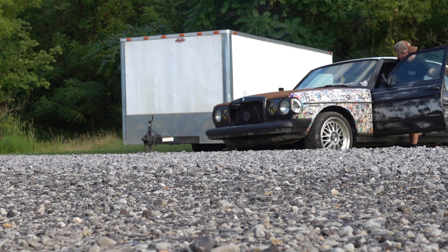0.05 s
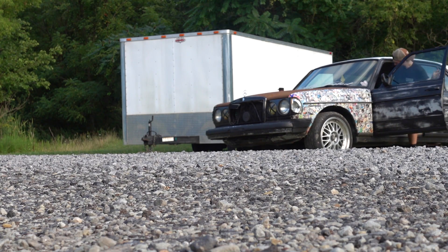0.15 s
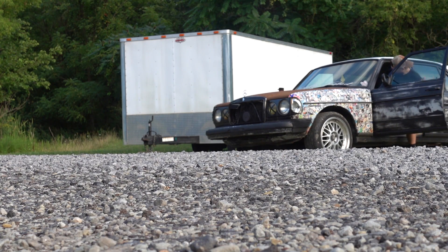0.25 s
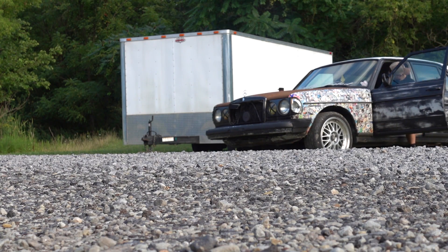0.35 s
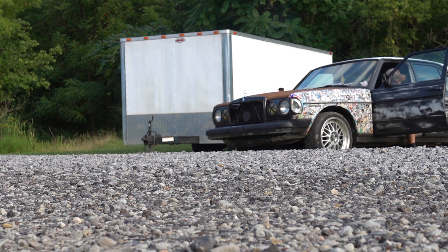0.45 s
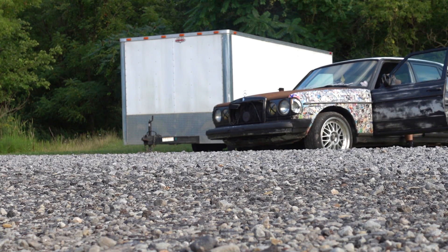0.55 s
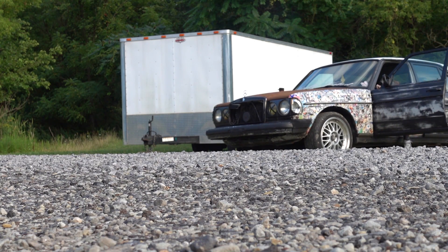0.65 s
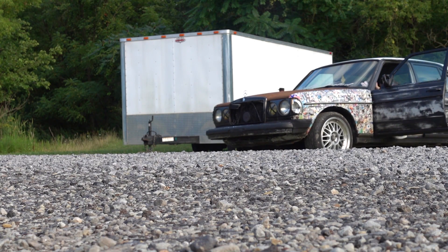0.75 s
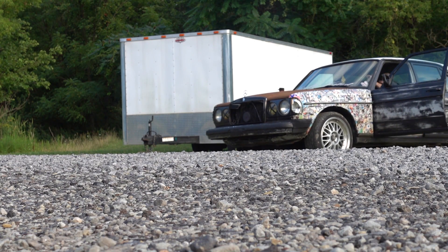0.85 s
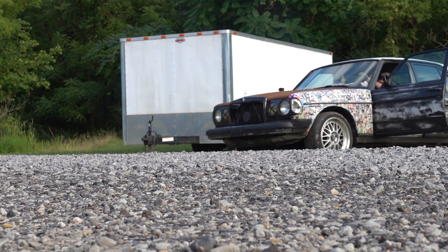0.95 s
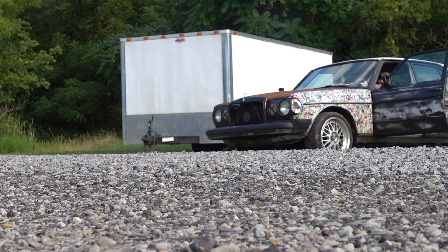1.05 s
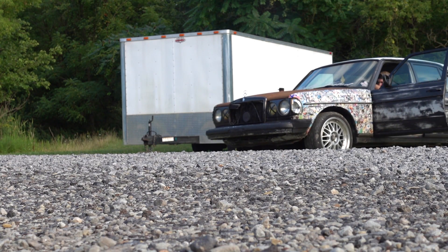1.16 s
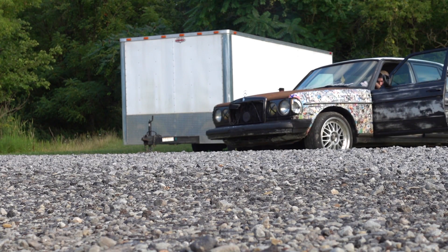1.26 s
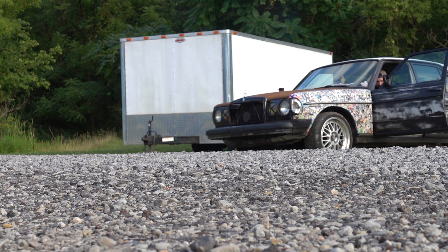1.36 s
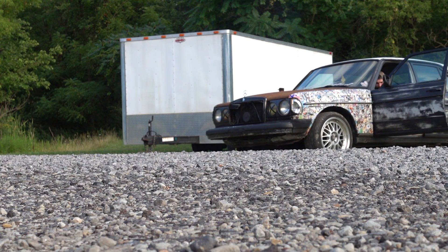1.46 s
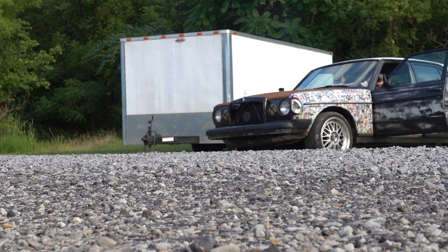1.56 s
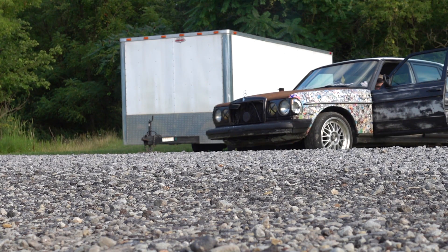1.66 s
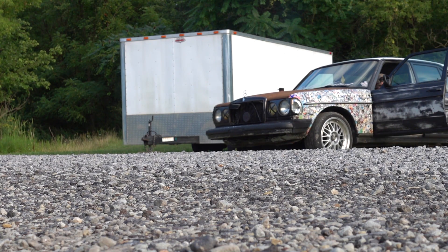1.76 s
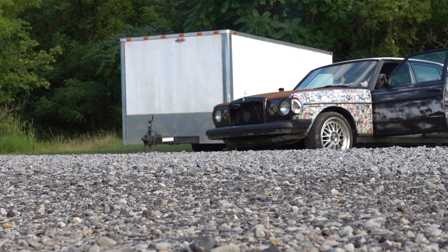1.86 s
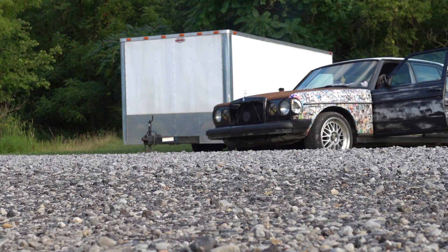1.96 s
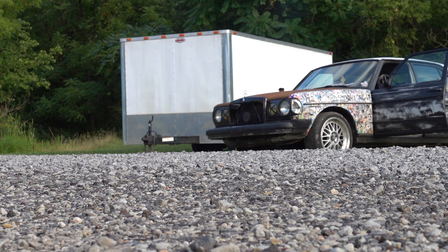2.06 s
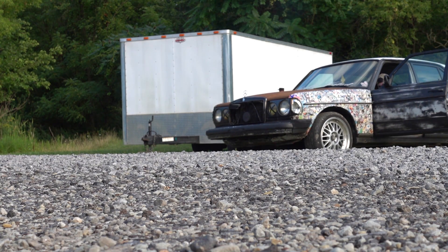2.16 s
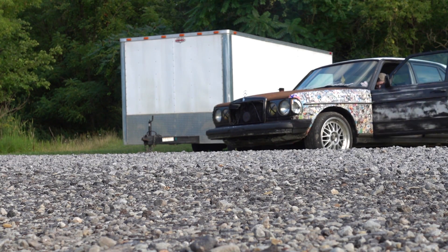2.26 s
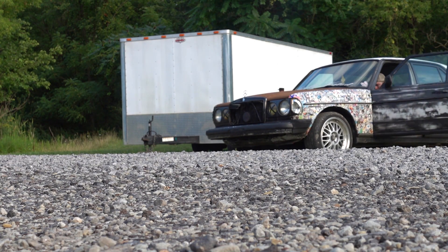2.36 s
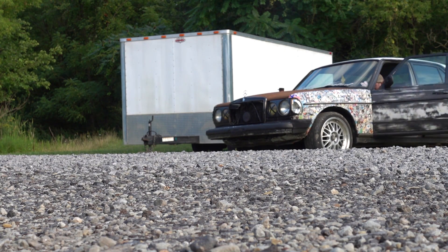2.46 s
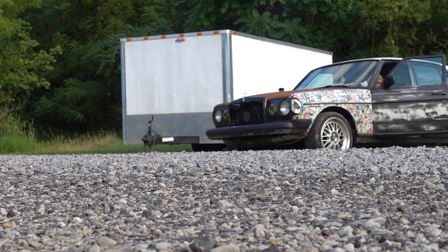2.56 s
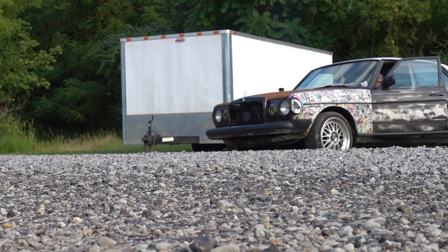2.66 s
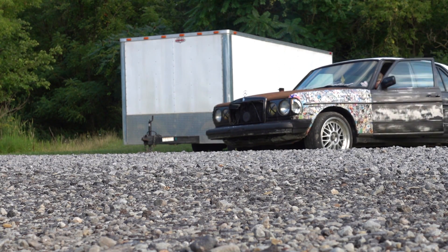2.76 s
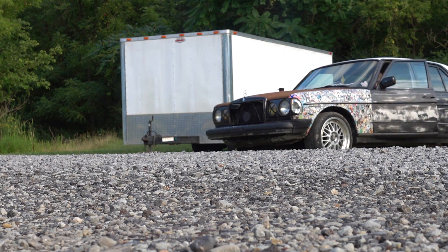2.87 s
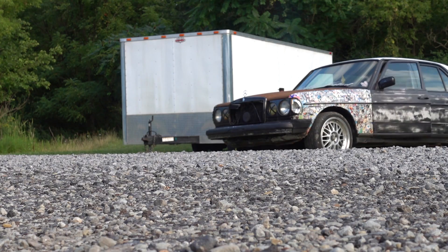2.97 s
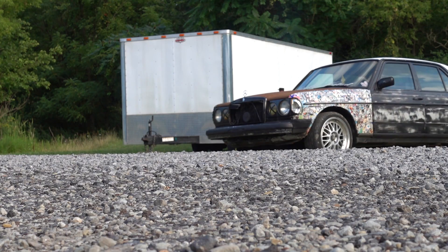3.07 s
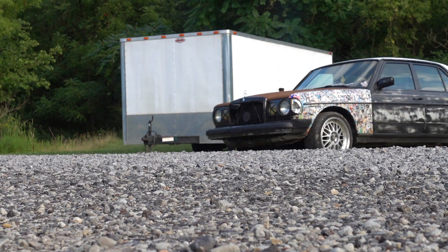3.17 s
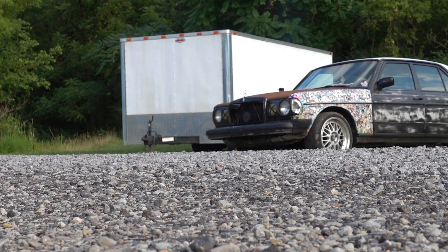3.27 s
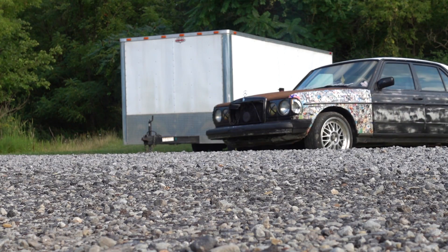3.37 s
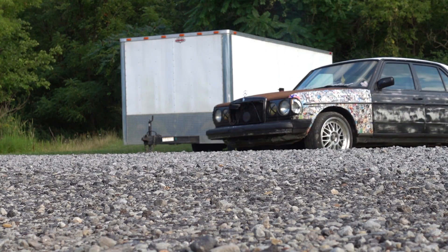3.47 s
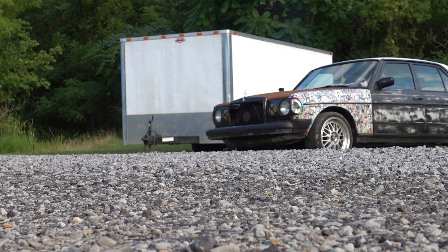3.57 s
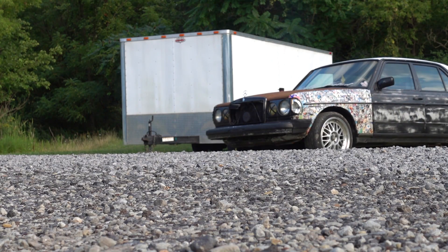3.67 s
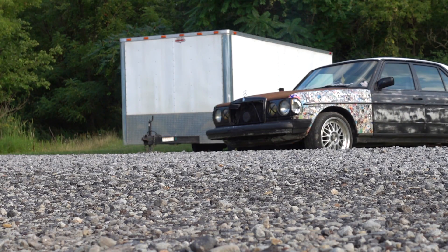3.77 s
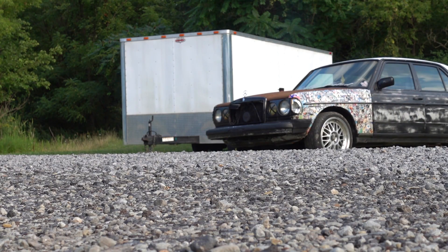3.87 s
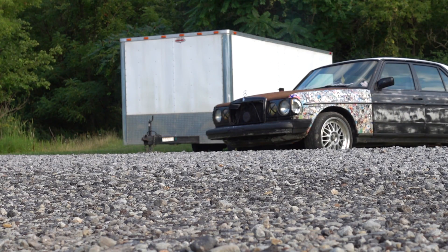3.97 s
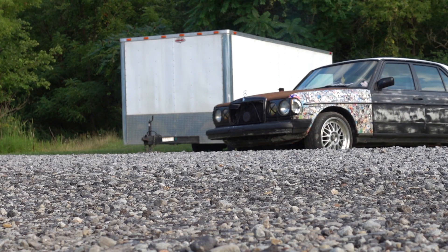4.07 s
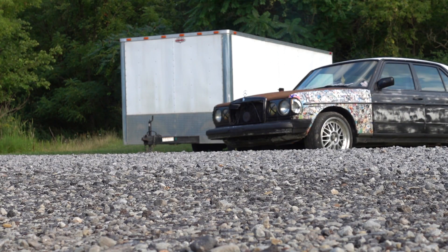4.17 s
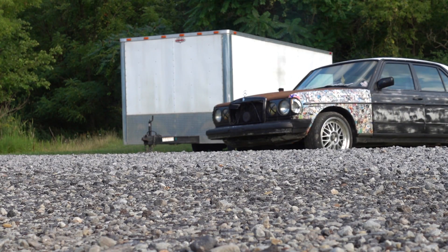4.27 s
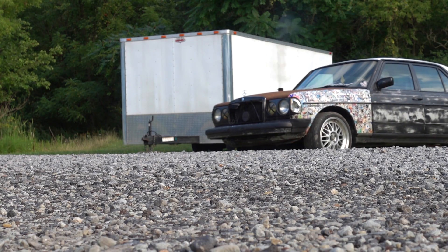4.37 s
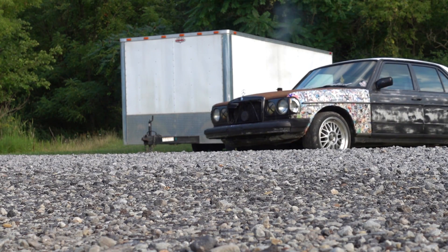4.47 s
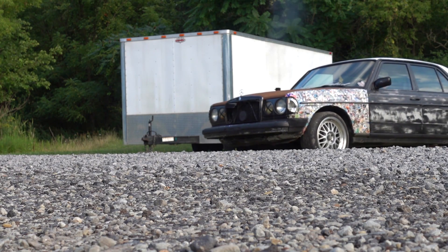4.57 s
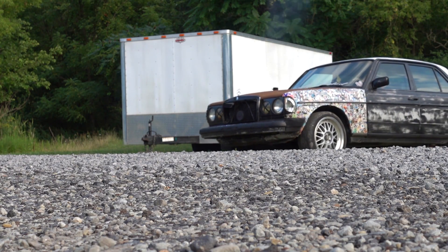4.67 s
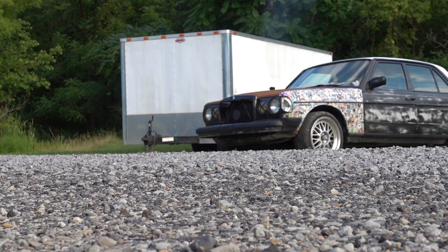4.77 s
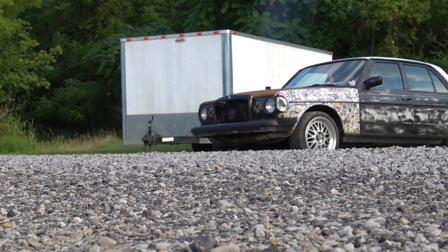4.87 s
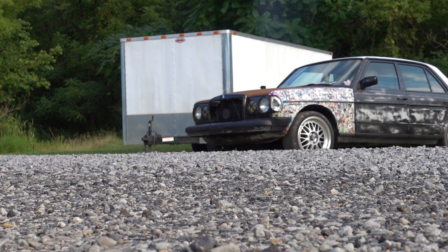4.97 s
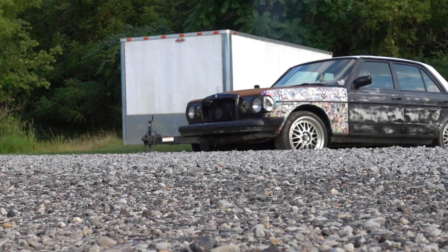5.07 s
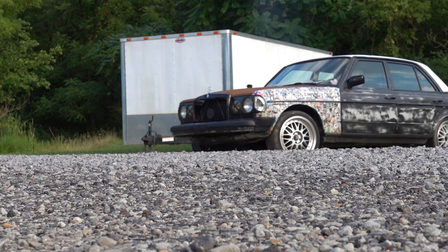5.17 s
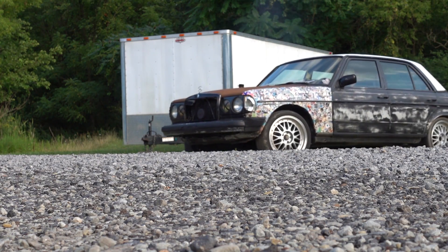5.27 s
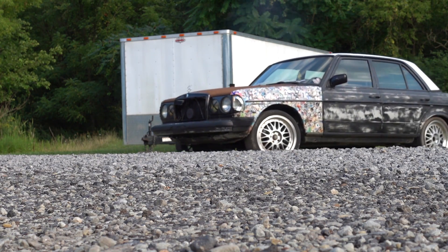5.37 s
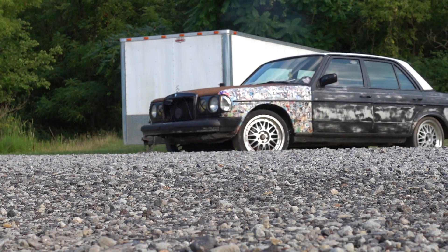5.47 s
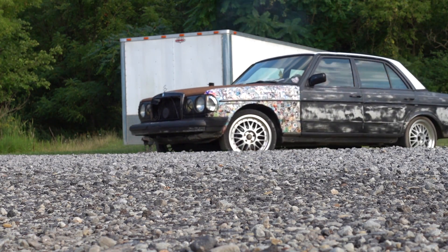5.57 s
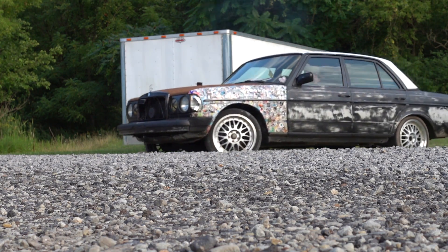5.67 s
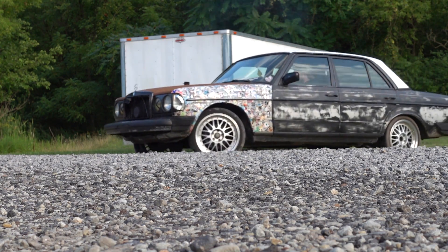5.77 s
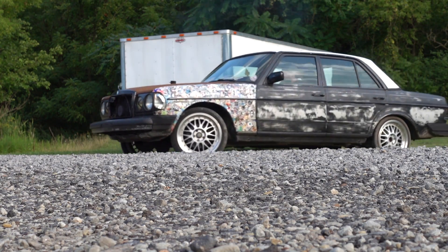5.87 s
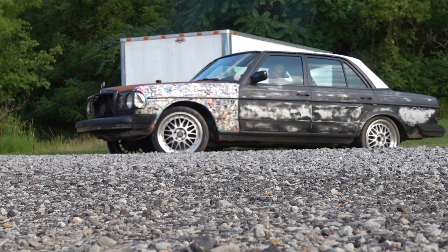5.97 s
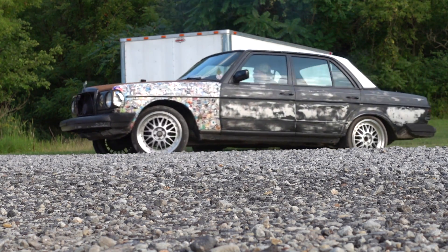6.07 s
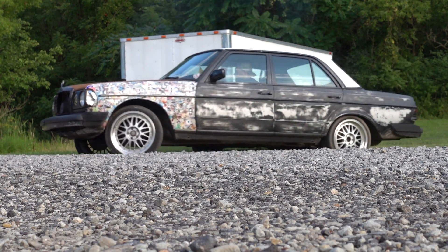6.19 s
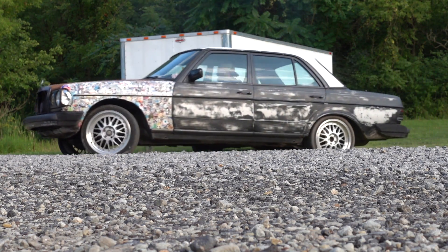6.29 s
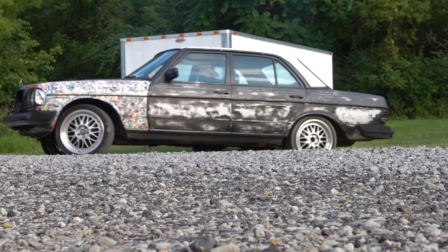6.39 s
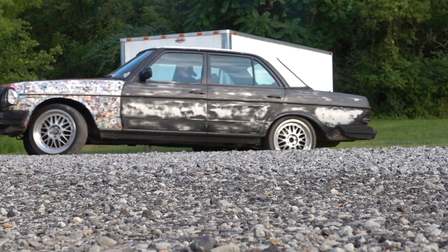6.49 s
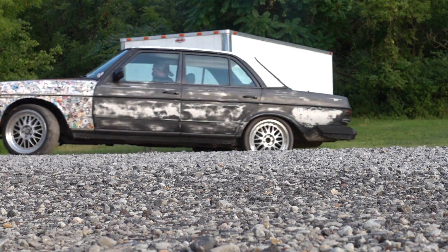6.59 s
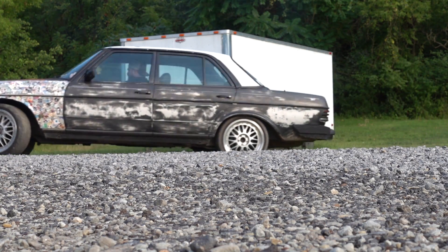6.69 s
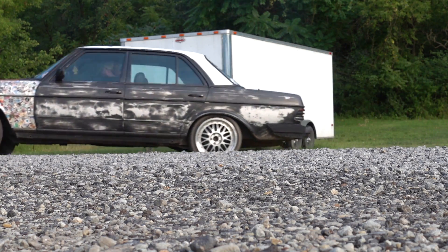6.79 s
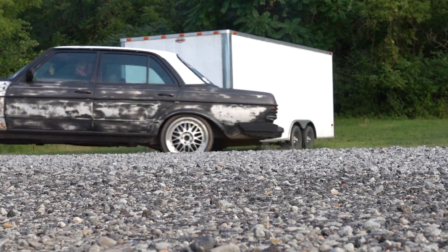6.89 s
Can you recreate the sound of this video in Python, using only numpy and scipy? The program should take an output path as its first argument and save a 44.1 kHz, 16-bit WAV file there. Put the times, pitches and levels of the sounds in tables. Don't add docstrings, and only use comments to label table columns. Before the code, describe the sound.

Rattly diesel idle with faint insects, one solid door slam, then a raspy, hissing rev and a loud roar as the car passes leftward.

```python
import sys
import numpy as np
from scipy import signal
from scipy.fft import rfft, irfft, next_fast_len
from scipy.io import wavfile
from scipy.ndimage import map_coordinates

SR = 44100
rng = np.random.default_rng(int(sys.argv[2]) if len(sys.argv) > 2 else 0)


def to_wav(sig):
    pcm = np.clip(np.atleast_2d(sig), -1, 1) * 32767
    pcm = np.round(pcm).astype(np.int16)
    wavfile.write(sys.argv[1], SR, pcm.T)


def volts_from_decibels(level):
    exponent = np.asarray(level, float) / 20
    return 10 ** exponent


N = 305613
T = np.arange(N) / SR

# [t/s, firing rate/Hz]
FIRING_RATE = [(0, 30.5), (4.27, 30.54), (4.38, 43.62), (4.45, 49.72), (4.55, 54.49), (4.7, 58.45),
               (4.9, 60.75), (5.1, 60.54), (5.25, 62.15), (5.4, 65.3), (5.7, 75), (5.85, 77.8), (6.1, 81.7),
               (6.2, 81.1), (6.4, 75.1), (6.6, 71), (6.8, 69), (6.93, 69.77)]
# [order, level/dB]
IDLE_ORDERS = [(5, -51), (14, -50), (15, -40), (16, -45), (18, -47), (19, -43), (20, -37), (21, -45),
               (23, -48), (26, -49), (28, -36), (29, -40), (30, -48), (31, -46), (33, -43), (35, -48)]
# [knock level/dB, valve tick level/dB]
CYLINDERS = [
    (-3, -10),
    (0, -10),
    (-13, -14),
    (-6, -12),
    (-2, 0),
]
# [f/Hz, width/Hz, level/dB]
BLOCK_RINGS = [
    (1410, 25, -10),
    (1700, 45, 0),
    (1860, 80, -15),
]
# [f/Hz, width/Hz, level/dB]
PIPE_RINGS = [(418, 90, -7.5), (587, 94, 0.5), (889, 64, -6), (971, 49, -1.5), (1320, 76, -7.5),
              (1623, 130, -13), (2072, 63, -9.5), (2490, 160, -12.5), (2920, 150, -12.5), (3400, 107, -14)]
# [f/Hz, level per Hz/dB]
CHUG_COLOUR = [(15, -47), (25, -13), (43, -18), (101, -7.5), (179, -3.5), (267, -10.5), (497, -9),
               (974, -12.5), (1720, -13), (2020, -23), (2430, -27.5), (6420, -36), (7750, -35),
               (9360, -39.5), (15600, -51)]
# [f/Hz, level per Hz/dB]
TICK_COLOUR = [(600, -19), (1500, 11.5), (3000, -9.5), (4700, 5.5), (6500, -3), (11000, -9), (15500, -20)]
# [f/Hz, level per Hz/dB]
LEAK_COLOUR = [(2060, -8.5), (3500, -5), (3660, -6.5), (4360, -4), (5630, -0.5), (6670, -2.5), (8780, -7.5),
               (12400, -11), (15600, -19)]
# [f/Hz, level per Hz/dB]
PULLING_COLOUR = [(18, -55), (30, -37), (156, -1.5), (187, -2.5), (400, -10.5), (608, -9), (750, -12),
                  (1600, -12.5), (2700, -26), (2920, -21), (3610, -20.5), (8110, -21), (15600, -27)]
# [f/Hz, width/Hz, level/dB]
INSECT_BAND = [(7680, 940, 0)]
# [t/s, thump level/dB, click level/dB, click f/Hz]
DOOR_CONTACTS = [(2.511, -44, -47, 11100), (2.52, -48, -53, 12000), (2.599, -36, -60, 3000),
                 (3.168, -19.5, -35, 6000), (3.18, -16, -32, 4540), (3.186, -10, -28.5, 2900),
                 (3.198, -18, -23, 2320), (3.207, -9.5, -34, 5000), (3.229, -19, -44, 3000),
                 (3.247, -27, -41, 6000), (3.329, -42, -43, 10500), (2.508, -58, -23, 900)]
# [f/Hz, level/dB, time to fall 60 dB/s]
PANEL_RINGS = [(40, -13, 0.18), (81.5, -3, 0.17), (102.3, -12.5, 0.14), (176, 0, 0.094), (257, -1, 0.075),
               (286, -3.5, 0.082), (356, -9.5, 0.069), (450, -3, 0.061), (508, -4, 0.048),
               (704, -10, 0.046), (920, -8, 0.038), (1410, -6.5, 0.034)]
# [f/Hz, likeness]
ALIKE = [(60, .99), (130, 0.71), (290, 0.81), (640, 0.97), (1400, 0.85), (3100, 0.75), (5500, 0.37),
         (8000, 0.94), (15000, 0.57)]
# [f/Hz, likeness]
ALIKE_CALM = [(60, .99), (130, 1), (290, 0.99), (640, 0.97), (1400, 0.85), (3100, 0.75), (5500, 0.067),
              (8000, 0.067), (15000, 0.68)]
# [f/Hz, time to fall 60 dB/s]
YARD_DECAY = [(100, 0.12), (1000, 0.88), (8000, 0.23)]
# [f/Hz, phase/rad]
LEFT_LEAD = [(20, 0), (400, .08), (2200, .25), (2600, .8), (3400, 1), (4700, 1.6), (6000, 0), (6500, -1.1),
             (7800, -1), (8600, -.6), (10200, .15), (15300, .1)]
# [f/Hz, width/Hz, level/dB]
VALVE_RINGS = [(1210, 41, 0), (1437, 82, 2), (1710, 196, -4)]
# [t/s, level/dB]
THROTTLE = [
    (4.27, -11),
    (4.32, -3.5),
    (4.45, -0.5),
    (4.9, -0.5),
    (5.25, -1),
    (5.6, 1),
    (6.2, 1),
    (6.7, -2.5),
    (6.93, 1.5),
]
TAKE_UP = [4.225, 4.3]
# [middle t/s, half length/s, level/dB]
BOOMS = [
    (4.45, .14, 14),
    (5.925, 0.4, 21),
    (6.8, 0.17, 8),
]
# [f/Hz, level/dB]
SILENCER = [(40, -62), (70, -63), (95, -36.5), (130, -37.5), (175, -38.5), (235, -37), (290, -43.5),
            (450, -47.5)]
FIRING_ORDER_DB = {15: 5, 20: 9}

ROLL_S, ROLL_BEND = 5.05, 1.25
SHADE_DB, PAN_DB = -17, 3.5
CRUISE = 60
FIRING_DB, OCTAVE_DB, UNEVEN_DB = -45.5, -19, -0.5
OCTAVE_DB_PER_HZ, BOOM_TAKES_DB, TAILPIPE_DB = 0.44, 9, 4.5
HEAT_PER_HZ, COOLS = .004, .07
SHRILL_S, SHRILL_DB, SWELL_DB_PER_S, FADE_DB_PER_S = 3.3, -63, 15, 4
SCATTER_DB = 1.2
BOUNCE, BOUNCE_S, BOUNCE_SHRINKS_S = .55, .000245, .00005


def unit(x):
    return x / np.sqrt(np.mean(x ** 2) + 1e-20)


def along(points, hz):
    f, v = np.transpose(points)
    return np.interp(np.log(hz + 1), np.log(f + 1), v)


def curves(rows):
    s, *cols = np.transpose(rows)
    return [np.interp(T, s, c) for c in cols]


def wobble(rate):
    knots = rng.standard_normal(int(N * rate / SR) + 4)
    return map_coordinates(knots, [np.arange(N) * rate / SR])


def filtered(x, response):
    m = next_fast_len(x.shape[-1] + SR // 2)
    return irfft(rfft(x, m) * response(np.fft.rfftfreq(m, 1 / SR)), m)[..., :x.shape[-1]]


def modes(table):
    def response(f):
        return sum((-1) ** k * volts_from_decibels(db) * 1j * f * w / (c * c - f * f + 1j * f * w)
                   for k, (c, w, db) in enumerate(table))
    return response


def coloured(spectrum):
    return lambda hz: volts_from_decibels(along(spectrum, hz))


def noise(response, alike=ALIKE, size=N):
    def mid_side(hz):
        turn = np.arccos(np.clip(along(alike, hz), -1, 1)) / 2
        return response(hz) * [np.cos(turn), np.sin(turn)]
    mid, side = filtered(rng.standard_normal((2, size)), mid_side)
    return unit(np.array([mid + side, mid - side]))


def beats(firings, sizes_db, scatter_db, rise, rest, order=1):
    k = np.floor(firings).astype(int)
    size = volts_from_decibels(np.asarray(sizes_db)[k % len(sizes_db)] + scatter_db * rng.standard_normal(600)[k % 600])
    u = (firings - k) / rise
    return unit(size * (u * np.exp(1 - u)) ** order + rest)


def strikes(firings, sizes_db, scatter_db):
    at = np.flatnonzero(np.diff(np.floor(firings), prepend=0))
    size_db = np.asarray(sizes_db)[firings[at].astype(int) % len(sizes_db)]
    out = np.zeros(N)
    out[at] = volts_from_decibels(size_db + scatter_db * rng.standard_normal(len(at)))
    return out


def passed():
    return np.clip((T - ROLL_S) / (N / SR - ROLL_S), 0, 1) ** ROLL_BEND


def behind_body(x, corner_hz, share):
    top = filtered(x, lambda hz: 1 / (1 + (corner_hz / (hz + 1)) ** 4))
    return x + (volts_from_decibels(share * SHADE_DB * passed()) - 1) * top


def hum(firings, speed, load):
    cycle = 2 * np.pi * firings / 5
    boom_db = sum(db * np.exp(-np.abs((T - s) / half) ** 4.4) for s, half, db in BOOMS)
    octave_db = OCTAVE_DB + OCTAVE_DB_PER_HZ * np.minimum(speed - CRUISE, 0)
    octave_db = octave_db - BOOM_TAKES_DB * (boom_db / boom_db.max()) ** 4.4 + TAILPIPE_DB * passed() ** 0.54
    octave = volts_from_decibels(octave_db + .6 * wobble(9)) * np.cos(10 * cycle)
    out = load ** 3 * (octave - volts_from_decibels(FIRING_DB + boom_db) * np.sin(5 * cycle))
    for order, idle_db in IDLE_ORDERS:
        spread = -.02 * (order - 20) ** 2 + .14 * (-36 - idle_db) * rng.normal()
        wave = np.cos(order * (cycle - 5.3) + spread + .2 * wobble(4))
        out -= (1 - load ** 3) * volts_from_decibels(idle_db + .8 * wobble(3)) * wave
    for order in [k for k in range(6, 37) if k != 10]:
        level_db = along(SILENCER, order * speed / 5) + FIRING_ORDER_DB.get(order, 0)
        level_db = level_db + UNEVEN_DB + 2 * wobble(2.5) + 2 * wobble(7)
        wave = np.cos(order * cycle + 2 * np.pi * rng.random() + .5 * wobble(4))
        out += load * volts_from_decibels(level_db) * wave
    return np.sqrt(2) * out


def idle(firings):
    knock_db, tick_db = np.transpose(CYLINDERS)
    ignition = strikes(firings + .17, knock_db, 2.2)
    piston_slap = .9 * strikes(firings - .09, knock_db, 2.8)
    sharp = unit(ignition + piston_slap)
    rattle = beats(firings + 0.2, knock_db, 1.3, rise=0.19, rest=0.011) * noise(np.ones_like, ALIKE_CALM)
    knock = volts_from_decibels(-37) * unit(filtered(2.2 * sharp + rattle, modes(BLOCK_RINGS)))
    puffs = beats(firings + .19, tick_db, 1.3, rise=.16, rest=.03, order=2)
    tick = volts_from_decibels(-50.0) * puffs * noise(coloured(TICK_COLOUR), ALIKE_CALM)
    taps = strikes(firings + .15, 2 * tick_db, 1.5) + .7 * strikes(firings - .15, 2 * tick_db, 1.5)
    seat = volts_from_decibels(-43) * unit(filtered(taps, modes(VALVE_RINGS)))
    chug_beats = beats(firings + 0.28, [0.5, 0.75, -2.9, -2.0, 1.8], 0.9, rise=0.36, rest=0.79)
    chug = volts_from_decibels(-33.5) * chug_beats * noise(coloured(CHUG_COLOUR), ALIKE_CALM)
    return knock + tick + seat + chug


def insects():
    chorus = volts_from_decibels(-46.5 + 0.5 * wobble(2.7)) * noise(lambda hz: modes(INSECT_BAND)(hz) ** 2, ALIKE_CALM)
    below_peak_db = np.maximum(SWELL_DB_PER_S * (SHRILL_S - T), FADE_DB_PER_S * (T - SHRILL_S))
    hiss = noise(lambda hz: modes([(15200, 1100, 0)])(hz) ** 2, ALIKE_CALM)
    shrill = volts_from_decibels(SHRILL_DB - below_peak_db + 4 * wobble(60)) * hiss
    peep_shape = np.exp(-((T - 1.507) / .016) ** 4)
    peep = volts_from_decibels(-54) * peep_shape * np.sin(2 * np.pi * 3950 * T + .8 * wobble(90))
    return chorus + shrill + peep


def door():
    out, t = np.zeros(N), np.arange(SR // 2) / SR
    for s, thump_db, click_db, click_hz in DOOR_CONTACTS:
        ring = sum(volts_from_decibels(db + SCATTER_DB * rng.normal() - 60 * t / t60) * np.sin(2 * np.pi * hz * t)
                   for hz, db, t60 in PANEL_RINGS)
        burst = volts_from_decibels(click_db + 6 - 60 * t / 0.044) * rng.standard_normal(len(t))
        click = filtered(burst, lambda hz: modes([(click_hz, 1.2 * click_hz, 0)])(hz) ** 2)
        thump = volts_from_decibels(thump_db - 2) * ring * (1 - np.exp(-t / 0.001))
        out[round(s * SR):][:len(t)] += thump + click
    return out


def yard(x):
    hz, t, z = signal.stft(rng.standard_normal((2, SR // 2)), SR, nperseg=256)
    tail = signal.istft(z * volts_from_decibels(-60 * t / along(YARD_DECAY, hz)[:, None]), SR, nperseg=256)[1]
    late = np.pad(x, (500, 0))[None]
    return signal.fftconvolve(late, tail / np.linalg.norm(tail[0]), axes=1)[:, :N]


def roar(firings, speed, load):
    throttle_db, = curves(THROTTLE)
    surge = np.exp(-np.clip(T - 4.55, 0, None) / 0.33)
    leak_db = -28.5 + 1.13 * throttle_db + 6 * surge - 3.5 * passed()
    pipe_db = -22.5 + 0.84 * throttle_db - 2.2 * surge - 4.8 * passed() + 0.054 * (speed - CRUISE)
    block_db = -38 + 0.15 * throttle_db + 7 * surge - 12 * passed()
    body_db = -24 + 0.5 * throttle_db + 0.16 * (speed - CRUISE) + 3.4 * passed()
    early = np.clip(speed - 62, 0, None) / 70

    whistle = sum(volts_from_decibels(-11.5 + 1.8 * wobble(30)) * noise(modes([(hz, 700, 0)]))
                  for hz in (5500, 6880, 7800, 10270))
    jet = behind_body(noise(coloured(LEAK_COLOUR)) + whistle, 6900, 0.66)
    late = np.arange(N) - SR * (BOUNCE_S - BOUNCE_SHRINKS_S * passed())
    off_gravel = np.array([map_coordinates(c, [late]) for c in jet])
    jet = unit(jet - BOUNCE * passed() ** .5 * off_gravel)
    spits = beats(firings + early - .04, [0], 1.1, rise=.21, rest=.11 + .9 * early, order=3)
    leak = volts_from_decibels(leak_db) * load ** 3 * spits * jet

    cold = noise(lambda hz: sum(volts_from_decibels(db) * modes([(c, w, 0)])(hz) ** 2 for c, w, db in PIPE_RINGS), size=2 * N)
    path = np.cumsum(.985 + HEAT_PER_HZ * np.maximum(speed - CRUISE, 0) - COOLS * passed() ** 2)
    hot = [map_coordinates(c, [path]) for c in cold]
    pushes = beats(firings + early, [-1, 1.7, 0.94, -0.37, -0.69], 0.79, rise=0.41, rest=0.23)
    pipe = volts_from_decibels(pipe_db) * pushes * hot

    blows = beats(firings + 0.11, np.transpose(CYLINDERS)[0], 1.8, rise=0.17, rest=0.078) * noise(np.ones_like)
    ringing = filtered(blows, lambda hz: modes(BLOCK_RINGS)(hz) / (1 + (hz / 3500) ** 2))
    knock = volts_from_decibels(block_db) * unit(ringing)
    throbs = beats(firings + early, [0], 1.2, rise=0.18, rest=.9)
    body = volts_from_decibels(body_db + .6 * wobble(25)) * throbs * noise(coloured(PULLING_COLOUR))
    engine = leak + knock + behind_body(pipe + body, 1300, 0.5)
    return load * behind_body(engine, 11500, 1.3)


def gravel():
    s = 5 + 1.93 * np.sqrt(rng.random(1500))
    sizes = volts_from_decibels(rng.normal(0, 4, 1500)) * rng.choice([-1, 1], 1500)
    pops = np.bincount(np.clip(s * SR, 0, N - 1).astype(int), sizes, N)
    return volts_from_decibels(-49.0) * unit(filtered(pops, lambda hz: modes([(2200, 3000, 0)])(hz) ** 2))


def scene():
    speed, = curves(FIRING_RATE)
    firings = np.cumsum(speed) / SR
    load = np.interp(T, TAKE_UP, [0, 1])
    pan = volts_from_decibels(np.array([[.5], [-.5]]) * PAN_DB * passed())
    car = hum(firings, speed, load) * volts_from_decibels([[.3], [-.3]])
    car = car + (1 - load ** 3) * volts_from_decibels(6.8 * load) * idle(firings)
    car = car + pan * roar(firings, speed, load)
    hits = door() + gravel()
    return car + hits + volts_from_decibels(-12.5) * yard(hits) + insects()


def top_cut(x):
    return signal.sosfilt(signal.butter(12, 15760, fs=SR, output="sos"), x)


def record(dry):
    half = np.array([[.5j], [-.5j]])
    heard = filtered(dry, lambda hz: np.exp(half * along(LEFT_LEAD, hz)))
    return top_cut(heard)


dry = scene()
out = record(dry)
to_wav(out)
```